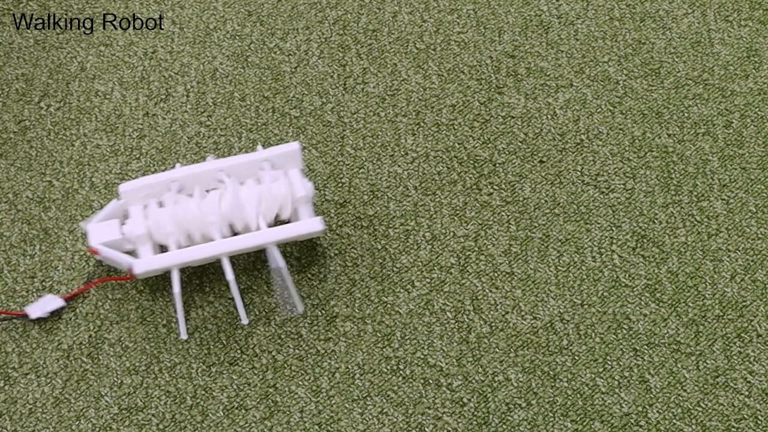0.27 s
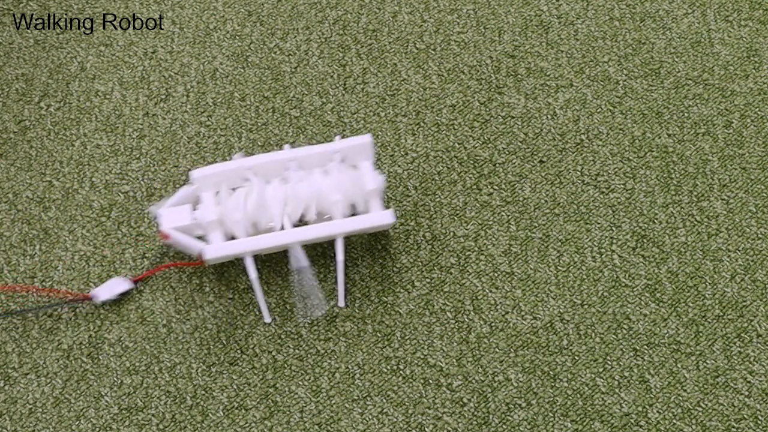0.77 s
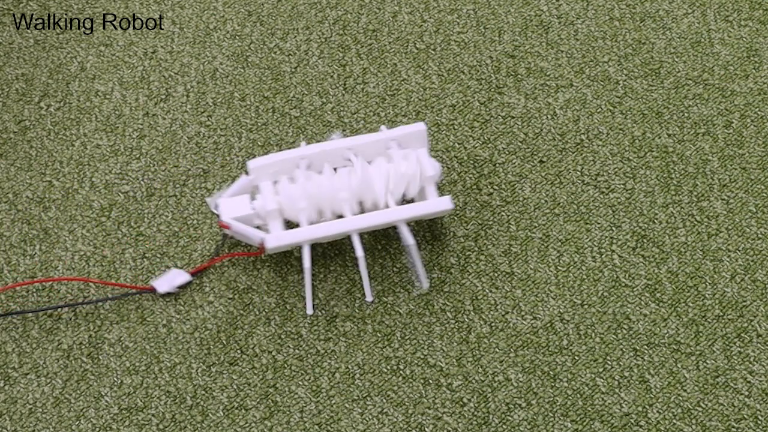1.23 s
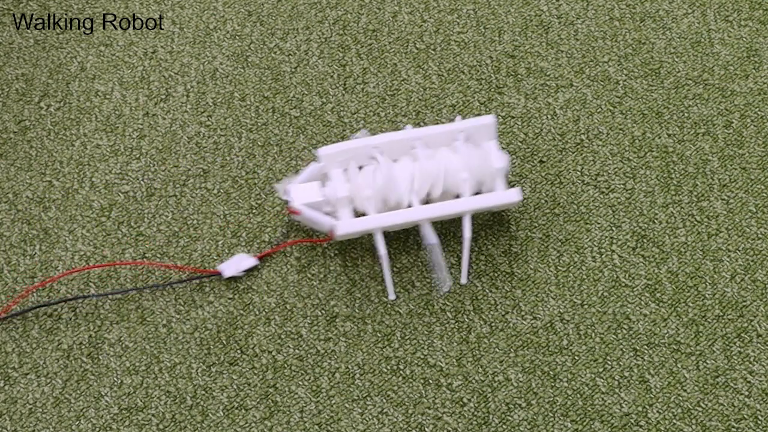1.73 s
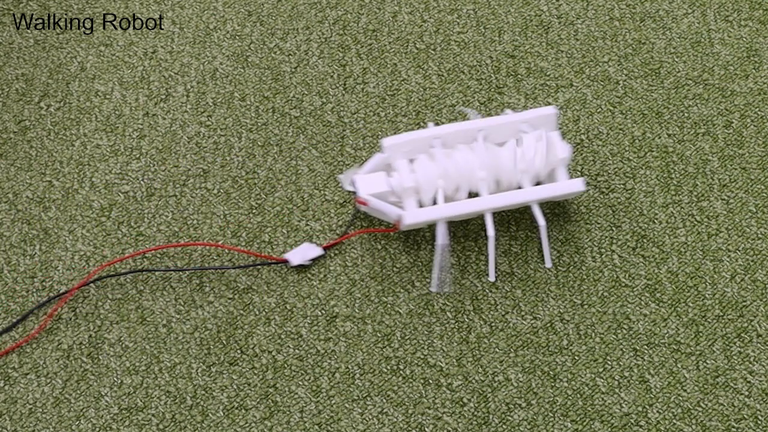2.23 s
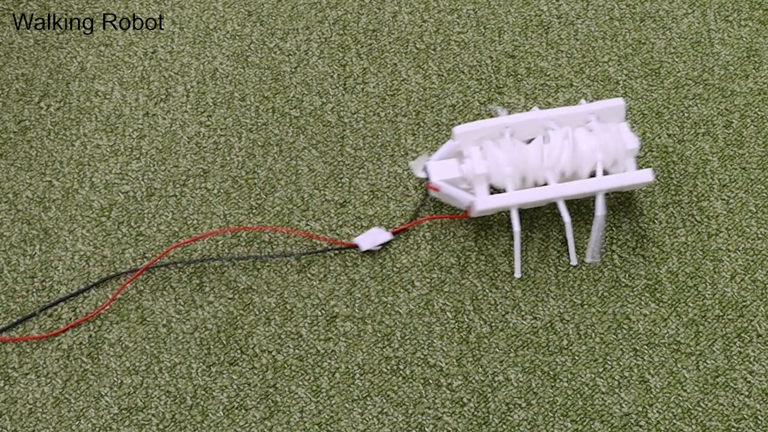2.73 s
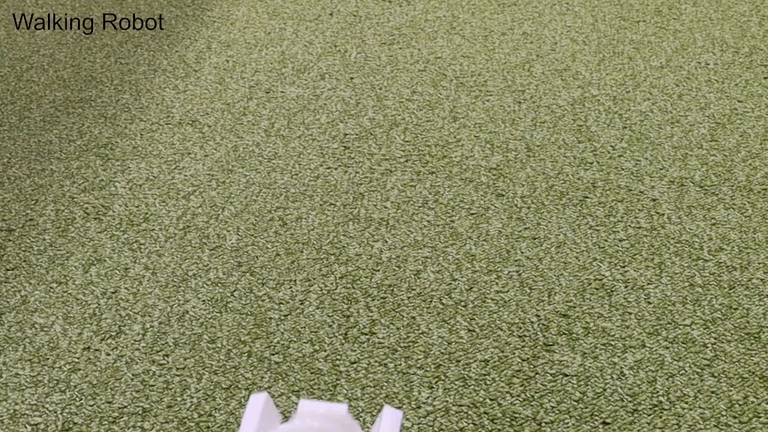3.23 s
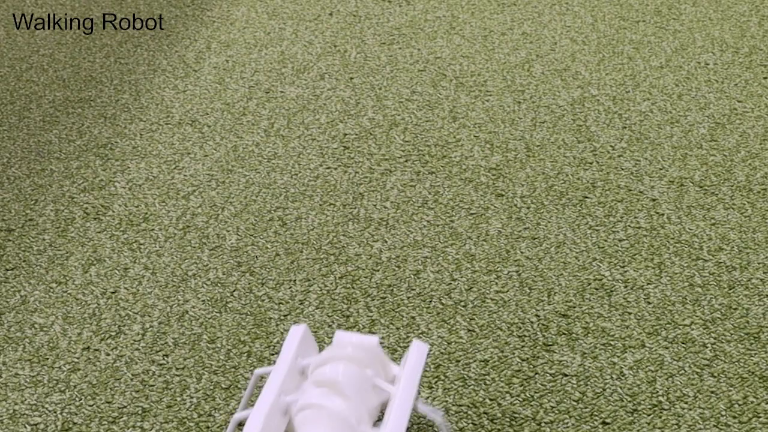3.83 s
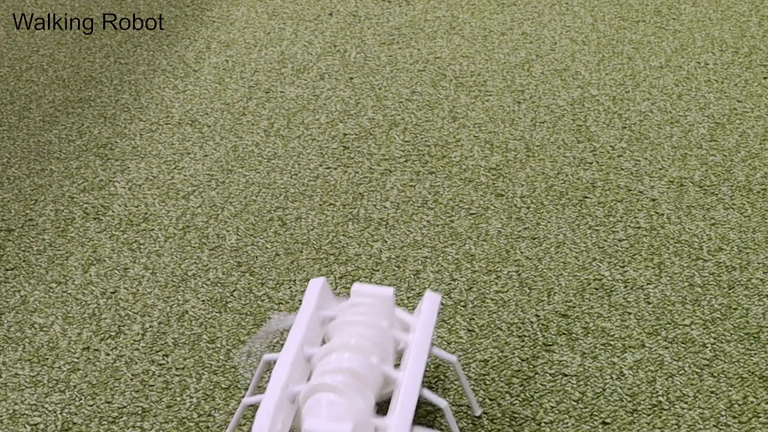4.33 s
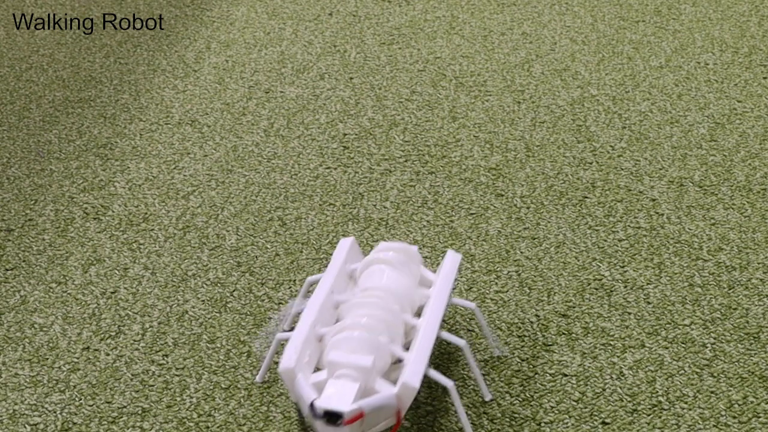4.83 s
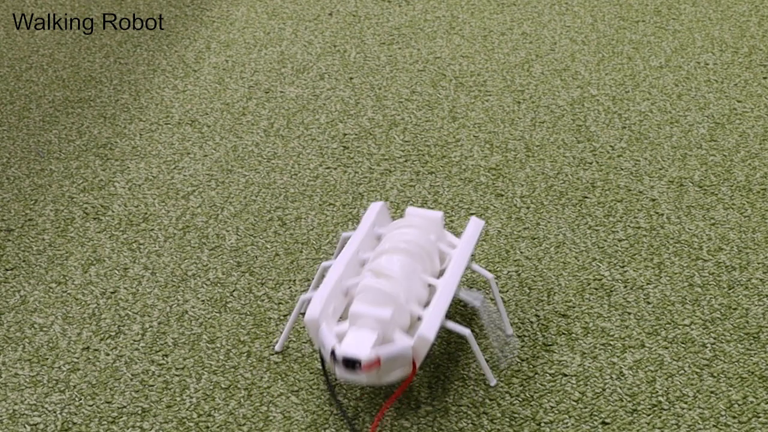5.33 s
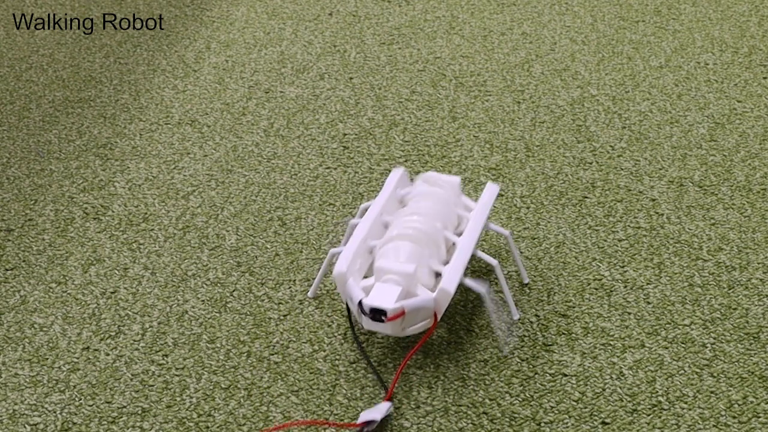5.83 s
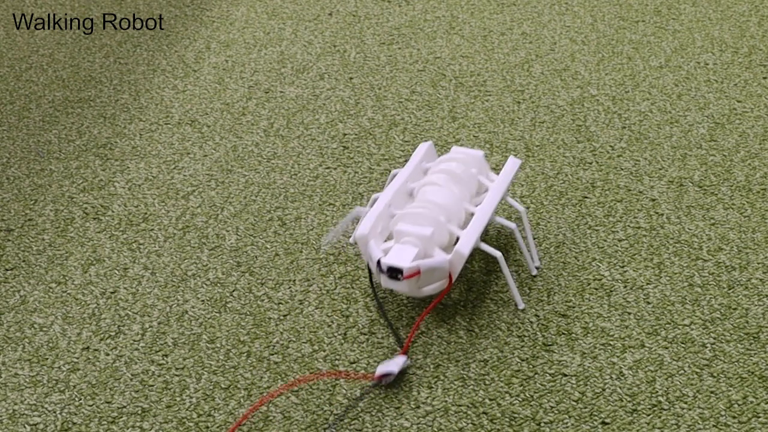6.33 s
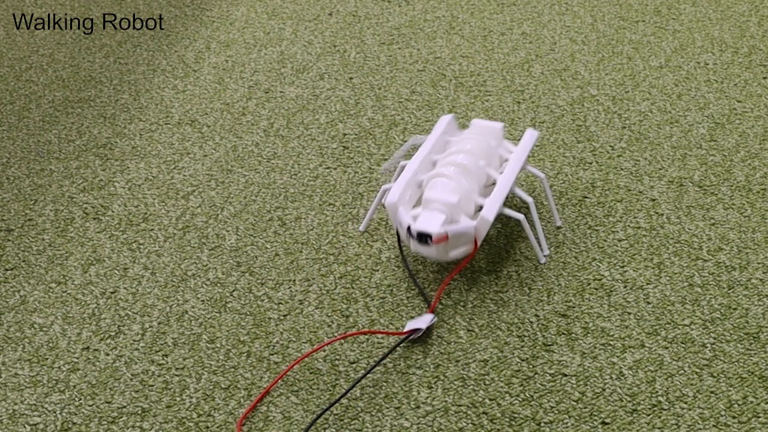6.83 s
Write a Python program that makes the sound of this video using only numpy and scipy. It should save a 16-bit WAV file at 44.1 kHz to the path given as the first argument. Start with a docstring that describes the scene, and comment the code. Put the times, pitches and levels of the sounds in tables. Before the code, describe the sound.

A small six-legged plastic robot walks across carpet in a quiet, damped room. Its geared motor whines at a high pitch, sagging, squealing and recovering about three times a second, while gear teeth rasp and loose links rattle lightly. It passes from the left to slightly right. After about three seconds the sound abruptly turns closer and hoarser, with a hollow growl and louder clicking, then eases a little as the robot walks away.

```python
"""A quiet, damped, carpeted room with a low hum. A small six-legged plastic robot walks through it,
heard first from the side, then closer from behind. One turn of its camshaft is one stride: lifting
the body drags the geared motor down, so that its whine sags, squeals and recovers. The gear teeth
rasp, each footfall shakes the loose links, and the hollow chassis drones on the carpet."""
import sys
import numpy as np
from scipy import signal
from scipy.fft import rfft, irfft, next_fast_len
from scipy.io import wavfile
from scipy.ndimage import uniform_filter1d, map_coordinates

SR = 44100
rng = np.random.default_rng(int(sys.argv[2]) if len(sys.argv) > 2 else 0)


def transcribe(u):
    """Save the signal u as a 16-bit wav file named by the first command-line argument.

    u: samples, shape (n,) or (channels, n), limited to [-1, 1]; the rate is SR.
    q: integer samples, one column per channel.
    """
    v = np.clip(np.atleast_2d(u).T, -1, 1)
    q = np.round(v * 32767).astype(np.int16)
    wavfile.write(sys.argv[1], SR, q)


N = 312669
T = np.arange(N) / SR
PINION, SHAFT = .288, .0302  # pinion tooth rate and motor turning rate as shares of the whine pitch
BODY_HZ, BODY_SCATTER = 1426, .074  # the frame's lowest ring, and its relative spread from tick to tick
# what the rubbing teeth radiate to the side: (frequency [Hz], level [dB])
SIDE_TEETH = [(600, -5), (2500, 1.5), (4200, -1), (5000, 4.5), (5900, 6.5), (6600, 8), (8400, 9.5),
              (10000, 4), (12600, 9.5), (13600, 4), (15500, -33)]


def undb(db):
    """Decibels to gain."""
    return 10 ** (np.asarray(db) / 20)


def unit(x):
    """Scale to rms 1."""
    return x / np.sqrt(np.mean(x ** 2))


def curves(table, at, period=None):
    """The columns of a table, joined by straight lines and read at the given places."""
    first, *columns = np.transpose(table)
    return [np.interp(at, first, c, period=period) for c in columns]


def drift(rate):
    """Smooth random motion of rms 1 that changes about rate times a second."""
    size = next_fast_len(N, True)
    rolloff = 1 + (np.fft.rfftfreq(size, 1 / SR) / rate) ** 4
    return unit(irfft(rfft(rng.standard_normal(size)) / rolloff, size)[:N])


def swell(angle, centre, width):
    """A smooth bump of height 1, once a turn; centre and width in turns."""
    return np.exp(-.5 * (((angle - centre + .5) % 1 - .5) / width) ** 2)


def colour(x, points, size=4096):
    """Minimum-phase EQ along (Hz, dB) points, rolled off below; white input keeps its level."""
    hz, db = np.transpose(points)
    f = np.fft.rfftfreq(size, 1 / SR) + 1
    gain = unit(undb(np.interp(np.log(f), np.log(hz), db)) * np.minimum(f / hz[0], 1) ** 2)
    cepstrum = irfft(np.log(gain))[:size // 2]
    cepstrum[1:] *= 2
    return signal.fftconvolve(x, irfft(np.exp(rfft(cepstrum, size))))[:N]


def low_cut(x, hz=700):
    """Thin out the bass, which small parts do not radiate."""
    return signal.sosfilt(signal.butter(2, hz, "high", fs=SR, output="sos"), x)


def tail(t60, size=16384):
    """A dying burst of noise with energy 1."""
    burst = rng.standard_normal(size) * np.exp(-np.log(1000) * T[:size] / t60)
    return burst / np.linalg.norm(burst)


def clicks(rate, spread_db=2.2):
    """Random contacts, rate a second, of varying force."""
    force = undb(spread_db * np.clip(rng.standard_normal(N), -2, 2))
    return unit((rng.random(N) < rate / SR) * force * rng.choice([-1, 1], N))


def pings(times, peak_db, hz, cycles, size=2048):
    """Small contacts, each ringing at its own pitch and dying by 60 dB within so many cycles."""
    out = np.zeros(N + size)
    for s, gain, f in zip(times, undb(peak_db), hz):
        turn = f * T[:min(size, int(cycles / f * SR))]
        decay = np.exp(-np.log(1000) * turn / cycles)
        start = int(s * SR)
        out[start:start + len(turn)] += gain * np.cos(2 * np.pi * turn) * decay
    return low_cut(out[:N])


def ticks(force_db, hz, scatter, cycles, count):
    """Separate ticks at random moments, uneven in strength and pitch."""
    at = rng.integers(0, N, count)
    strength, pitch = np.clip(rng.standard_normal((count, 2)), -1.7, 1.7).T
    return pings(at / SR, force_db[at] + 3 * strength, hz[at] * np.exp(scatter * pitch), cycles)


def room_tone(rumble_db, width_db):
    """A bed of low room noise with a slightly wavering hum, nearly alike on both sides."""
    # the room's rumble: (frequency [Hz], level [dB])
    rumble = [(36, -6), (48, -4), (60, -2), (135, -4.5), (210, -4), (340, 4), (480, -0.5), (1000, 3),
              (8000, -73)]
    # its steady hum: (frequency [Hz], level [dB])
    hum_tones = [(48.4, -74), (100, -66)]
    mid, side = (colour(rng.standard_normal(N), rumble) for _ in range(2))
    hum = sum(np.sqrt(2) * undb(db) * np.sin(2 * np.pi * hz * T + .38 * drift(4.3))
              for hz, db in hum_tones)
    return hum + undb(rumble_db) * (mid + undb(width_db) * side * np.array([[1], [-1]]))


def room(flanks, flank_db, echo_db, shade):
    """Each ear favours one flank of the robot; near reflections shift; damped walls answer dimly."""
    # the robot's stereo path: (time [s], left minus right [dB], left later than right [ms])
    path = [(0.2, 3.7, -.015), (0.75, 3.2, -.005), (2.95, -1.7, .035), (3.05, -0.1, 0), (4.3, 0, 0),
            (7.0, -1.4, .03)]
    mid = flanks.mean(axis=0)
    treble = low_cut(mid, 500)
    echoes = sum(shift(2.5 * T) * signal.fftconvolve(treble, tail(t60=.06))[:N]
                 for shift in (np.sin, np.cos))
    spread = undb(flank_db) * (flanks[0] - mid) + undb(echo_db) * echoes
    # the left side is a little brighter, the right a little fuller
    bright, full = (signal.sosfiltfilt(signal.butter(1, band, "band", fs=SR, output="sos"), mid)
                    for band in ([10500, 20000], [900, 3800]))
    spread += shade * (bright - full)
    pan_db, lag_ms = curves(path, T)
    ears = []
    for side in (1, -1):
        walls = undb(-13) * signal.fftconvolve(mid, np.roll(tail(t60=.2), SR // 200))[:N]
        delayed = (T - side * lag_ms / 2000) * SR
        direct = map_coordinates(mid + side * spread, [delayed], order=5, mode="mirror")
        ears.append((direct + walls) * undb(side * pan_db / 2))
    return np.array(ears)


def chassis_drone(level_db):
    """The hollow chassis drones on the carpet."""
    # its resonances: (frequency [Hz], level [dB])
    chassis = [(160, -19.5), (186, 1.5), (222, -10), (252, 0.5), (285, -8.5), (330, -4), (450, -24.5)]
    return colour(rng.standard_normal(N), chassis) * undb(level_db)


def link_taps(force_db, favoured_hz, count, t60=.021, fall_db_per_octave=11.5):
    """Each tap rings the links' modes in its own mix, most of all those near the favoured pitch."""
    # the links' modes: (frequency [Hz], level [dB])
    modes = [(2620, -1), (2960, -3), (3560, 2), (4110, 3)]
    at = rng.integers(0, N, count)
    tap_db = force_db[at] + 3.5 * np.clip(rng.standard_normal(count), -2, 1.5)
    t = T[:int(t60 * SR)]
    out = 0
    for hz, db in modes:
        octaves_off = np.abs(np.log2(hz / favoured_hz[at]))
        taps = np.zeros(N)
        taps[at] = undb(tap_db + db - fall_db_per_octave * octaves_off) * rng.uniform(-1, 1, count)
        ring = np.sin(2 * np.pi * hz * t) * np.exp(-np.log(1000) * t / t60)
        out = out + signal.fftconvolve(taps, ring)[:N]
    return low_cut(out)


def link_rattle(angle, frame, from_behind, gain_db, chatter_db, tap_db, body_db):
    """Loose links on both flanks chatter and tick at each footfall and set the frame ringing."""
    # feet landing: (angle [turns], width [turns], side boost [dB], rear boost [dB], favoured ring [Hz])
    footfalls = [(.0, 0.049, 8, 8.5, 2740), (.118, 0.025, 6, 6.5, 2330), (.29, 0.14, 4, 4, 2790),
                 (.38, 0.033, 2.5, 4.5, 3630), (.7, 0.083, 0, 3, 3000), (.89, 0.038, 2.5, 7, 2820)]
    shake_db = sum((rear_db if from_behind else side_db) * swell(angle, turn, width)
                   for turn, width, side_db, rear_db, _ in footfalls)
    ring_hz = curves(footfalls, angle, period=.97)[-1]
    force_db = shake_db + .98 * drift(6.4) + gain_db  # no two steps land alike
    flanks = []
    for _ in range(2):
        chatter = unit(clicks(2800, 2.4) * undb(1.5 * drift(130)))
        taps = link_taps(force_db + tap_db, ring_hz, count=620)
        body = ticks(force_db + body_db, np.full(N, BODY_HZ), BODY_SCATTER, cycles=90, count=380)
        flanks.append(colour(chatter * undb(chatter_db + force_db), frame) + taps + body)
    return np.array(flanks)


def link_knocks(rebound_db, body_db):
    """A link snaps over with a brief crack, rings, rebounds at a lower pitch and shakes the frame."""
    # links snapping over their play, and one knock as the scene changes at 3.015 s: (time [s], peak level [dB],
    # ring [Hz])
    snaps = [(0.3634, -22, 2850), (0.68, -20, 2950), (0.9937, -18, 3060), (1.115, -14.5, 6460),
             (3.0149, -16, 2750), (3.1284, -15, 3460), (3.1743, -13.5, 5600), (3.21, -14, 4080),
             (3.4398, -13.5, 3550), (3.543, -13, 3540), (3.8366, -14, 4050), (4.0677, -19, 2600),
             (4.6232, -12, 7140), (4.6922, -10, 3470), (4.775, -12.5, 4050), (4.8936, -14, 2810),
             (4.926, -16.5, 3580), (5.009, -11.5, 4090), (5.197, -18, 2580), (5.206, -20, 4120),
             (5.239, -17, 3530), (5.318, -15.5, 4220), (5.3327, -20, 2640), (5.7135, -16, 4090),
             (5.8205, -24, 2750), (5.953, -18, 4050), (6.1354, -23, 2700), (6.268, -18, 4090)]
    s, db, hz = np.transpose(snaps)
    ring = pings(s, db, hz, cycles=75)
    rebound = pings(s + rng.uniform(.0015, .004, len(s)), db + rebound_db, .76 * hz, cycles=45)
    body_hz = BODY_HZ * np.exp(BODY_SCATTER * rng.standard_normal(len(s)))
    body = pings(s + .003, db + body_db, body_hz, cycles=30)
    crack = signal.fftconvolve(pings(s, db, hz, cycles=4), tail(t60=.015))[:N]
    return ring + rebound + body + crack


def frame_growl(motor, level_db):
    """As the load builds, the frame jolts unevenly about once a motor turn: a hollow growl."""
    # what the juddering frame radiates: (frequency [Hz], level [dB])
    hollow = [(2050, -28), (2400, -7), (2600, 0), (2800, -3), (2980, -2), (3400, -25)]
    noise = rng.standard_normal(N)
    jolts = SHAFT * motor["cycles"] + .2 * drift(40)
    strength = rng.uniform(.3, 1, N)[np.floor(jolts).astype(int)]
    judder = unit(np.exp(-(jolts % 1) / .3) * strength)
    return colour(noise * judder, hollow) * swell(motor["angle"], .942, .075) * undb(level_db)


def cam_scrape(angle, level_db):
    """The cam slides off with a thin, high scrape."""
    scrape = colour(clicks(9000), [(10500, -25), (13300, 0), (14300, 2), (15500, -11)])
    return scrape * swell(angle, .12, .055) * undb(level_db)


def tooth_skid(angle, level_db):
    """At mid-stride the motor races and the unloaded teeth skid."""
    skid = colour(clicks(9000), [(7600, -33), (8350, -4), (8700, -3), (9300, -4), (10500, -35)])
    return skid * swell(angle, .503, .053) * undb(level_db)


def tooth_rasp(motor, spectrum, level_db, grit_db):
    """Teeth rub on each flank, harder when running free; single ones catch with bright, gritty ticks."""
    meshing = 1 + .5 * np.cos(motor["pinion_phase"])
    rubs = [unit(clicks(16000) * meshing * undb(.8 * drift(120))) for _ in range(2)]
    accents_db = 3.24 * swell(motor["angle"], .63, .084) + 3 * swell(motor["angle"], .15, .035)
    rub_db = level_db - 1.65 * motor["load"] + accents_db
    rasp = [colour(rub * undb(rub_db), spectrum) for rub in rubs]
    grit = [ticks(rub_db + grit_db, 2.6 * motor["nominal_hz"], scatter=.17, cycles=70, count=1600)
            for _ in range(2)]
    return np.array(rasp) + np.array(grit)


def geared_motor(angle, speed, race_hz, hoarseness):
    """Control signals of the motor: it sags as it lifts the body and chirps when it runs free."""
    # motor speed through a stride, dropping at each bite: (angle [turns], nominal whine pitch [Hz])
    stride_pitch = [(0, 3740), (.11, 3810), (.155, 3600), (.19, 4060), (.26, 4040), (.295, 4200),
                    (.35, 4070), (.45, 4260), (.52, 4280), (.57, 4100), (.63, 4140), (.77, 4110),
                    (.83, 4210), (.89, 4100), (.95, 4020)]
    # no two strides weigh the same: (time [s], nominal pitch shift under load [Hz], squeal boost [dB])
    strides = [(.03, -49.5, 1.5), (.35, -25.5, 2), (.66, -10.5, -1), (.98, 49.5, 3), (1.3, -5.5, 2.5),
               (1.61, 35, 1.5), (1.93, -8.5, 0.5), (2.24, 50, 0), (2.56, 41.5, 1), (2.88, -11, 4),
               (3.03, 5, -3.5), (3.35, -9, -1.5), (3.66, 71, -1), (3.97, -6.5, -1), (4.29, -45, -1),
               (4.6, -60.5, -0.5), (4.91, -58.5, 1), (5.22, -40.5, 0), (5.54, -9, 0), (5.85, -39.5, 1),
               (6.16, -26.5, 3), (6.48, 0.5, 3.5), (6.79, 40.5, 4)]
    # teeth bite as a cam takes up a leg: (angle [turns], width [turns], nominal boost [dB])
    bites = [(.23, .02, 7), (.322, .016, 7.5), (.55, .022, 6), (.69, .08, 6), (0.9, 0.05, 6.5)]
    free_hz, sag_hz = 4160, 305.5  # loaded below this pitch, and fully so this much lower
    nominal_hz = curves(stride_pitch, angle, period=1)[0]
    nominal_hz += race_hz * swell(angle, .86, .06)  # it races just before the load arrives
    shift_hz, effort_db = curves(strides, T)
    load = np.clip((free_hz - nominal_hz) / sag_hz, 0, 1)
    strain = swell(angle, .92, .05)  # the slack is taken up just before the heaviest load
    free = (1 - load) * (1 - strain)
    bite_db = sum(db * swell(angle, turn, width) for turn, width, db in bites)
    # running free, the gears wind up and slip ten times a stride: short falling chirps
    slip = (10 * angle + .27 + .13 * drift(12)) % 1
    chirps = 1 - free * (.55 - .9 * np.sin(np.pi * slip ** 1.5) ** 2)
    waver = 1 + .005 * drift(40) + .007 * free * drift(5) + .025 * free * (.5 - slip)
    pitch = speed * (nominal_hz + load * shift_hz) * waver
    cycles = np.cumsum(pitch) / SR
    shaft_phase = 2 * np.pi * SHAFT * cycles + .57 * drift(25)
    pinion_phase = 2 * np.pi * PINION * cycles + 1.1 * drift(200)
    # under load the off-centre pinion binds once in every motor turn
    throb = 1 + (.2 + .35 * load) * (np.cos(shaft_phase) - .4 * np.cos(2 * shaft_phase))
    # slack teeth bounce, so the partials are cleanest while the load presses them together
    blur = .3 + hoarseness * free * undb(-bite_db)
    # once the body is lifted, the teeth let go at once and take hold again gradually
    since_release = (angle - .153) % 1
    release_db = -17 * uniform_filter1d(np.exp(-since_release / .06), size=150)
    return dict(angle=angle, nominal_hz=nominal_hz, pitch=pitch, cycles=cycles, load=load,
                strain=strain, effort_db=effort_db, bite_db=bite_db, release_db=release_db,
                chirps=chirps, throb=throb, blur=blur, pinion_phase=pinion_phase)


def partial(cycles, level_db, envelope, blur, flutter=2.5):
    """One line of gear tone; uneven teeth blur its phase (radians) and flutter its level."""
    flutter_db = 1.5 * flutter * np.tanh(drift(60))
    tone = np.sin(2 * np.pi * cycles + blur * drift(500))
    return unit(tone * envelope * undb(flutter_db)) * undb(level_db)


def gear_whine(motor, first_db, second_db, sideband_db, bite_depths):
    """Meshing teeth sing two partials that swell with each bite; the pinion adds a line above each."""
    cycles, load, chirps, bite_db = motor["cycles"], motor["load"], motor["chirps"], motor["bite_db"]
    first_grip_db, second_grip_db = (depth * bite_db + motor["release_db"] / 2 for depth in bite_depths)
    # the lowest partial shakes with the loose frame, comes and goes, and fades under load
    shake = .06 * drift(70)
    flicker = chirps ** .7 * undb(1.8 * drift(14))
    tone = partial(cycles + shake, first_db + first_grip_db - load, flicker, blur=.4, flutter=2.2)
    pulse = chirps * np.sqrt(motor["throb"])
    tone += partial(2 * cycles, second_db + second_grip_db + 3 * load, pulse, motor["blur"])
    # the hoarse pinion lines: the lower comes late in the stride, the upper with the bites
    late = chirps * swell(motor["angle"], .73, .14)
    tone += partial((1 + PINION) * cycles + 3 * shake, sideband_db, late, blur=.9, flutter=2.2)
    upper_db = sideband_db + 1.96 * bite_db - 8.5
    return tone + partial((2 + PINION) * cycles, upper_db, chirps * (1 - load), blur=.42)


def gear_squeal(motor, level_db, bite_depth, load_db, strain_db, undertone_db):
    """The third partial and its pinion sidebands squeal under load, gliding through resonances."""
    # how the gearbox passes the squeal: (frequency [Hz], gain [dB])
    gearbox = [(10300, -3.5), (11400, 1), (11900, -2), (12300, 0), (12750, -5), (13300, -5), (13900, -18)]
    load, throb = motor["load"], motor["throb"]
    contact_db = level_db + bite_depth * motor["bite_db"] + motor["release_db"]
    contact_db += (load_db + motor["effort_db"]) * load
    strained_db = contact_db + strain_db * motor["strain"]
    squeal = 0
    for order, db in ((3 - PINION, undertone_db), (3, 0), (3 + PINION, -8)):
        line_db = strained_db + db + curves(gearbox, order * motor["pitch"])[0]
        squeal += partial(order * motor["cycles"], line_db, motor["chirps"] * throb, motor["blur"] + .1)
    # the squealing contact also scrapes, which rings a broad resonance of the gearbox
    resonance = [(6000, -57), (9800, -19), (11600, 7.5), (12400, 12), (13300, 6), (15500, -11)]
    fizz = np.array([colour(clicks(11000), resonance) for _ in range(2)])
    return squeal + fizz * np.sqrt(throb) * undb(contact_db + 3.5 - 3 * load)


def camshaft(heavy_load_s, stride_s):
    """The angle of the evenly turning shaft in turns, 0 at the heavy load."""
    return (T - heavy_load_s) / stride_s % 1


def passing(nearest_s, fall_db_per_s):
    """Level in dB that peaks as the gearbox faces the listener and falls off before and after."""
    return -fall_db_per_s * (np.hypot(T - nearest_s, .3) - .3)


def robot_from_side():
    """The robot crosses from left to right: a clear whine and a light rattle."""
    # what the rattling frame radiates to the side: (frequency [Hz], level [dB])
    frame = [(150, -27.5), (480, -14.5), (800, -6.5), (1100, -1), (1500, 3.5), (1850, -3), (2300, -1.5),
             (2900, 2), (3600, 3), (4700, -5), (7000, -26), (15000, -6)]
    angle = camshaft(heavy_load_s=.0125, stride_s=.31595)
    facing_db = passing(nearest_s=2.2, fall_db_per_s=4.5)
    motor = geared_motor(angle, speed=1, race_hz=10.02, hoarseness=.08)
    return (gear_whine(motor, first_db=-38.5 - .36 * facing_db, second_db=-32.5 + .88 * facing_db,
                       sideband_db=-43 + facing_db / 2, bite_depths=(.6, 1.2))
            + gear_squeal(motor, -33 + facing_db, bite_depth=.6, load_db=10, strain_db=7.5,
                          undertone_db=-11.5)
            + cam_scrape(angle, -26.5)
            + tooth_rasp(motor, SIDE_TEETH, -24 + .24 * facing_db, grit_db=-1)
            + tooth_skid(angle, -29 + .47 * facing_db)
            + frame_growl(motor, -56 + 1.1 * facing_db)
            + link_rattle(angle, frame, from_behind=False, gain_db=.05 * facing_db,
                          chatter_db=-31.5, tap_db=-27.5, body_db=-39)
            + chassis_drone(-50.5))


def robot_from_behind():
    """The robot walks away, a little faster: a hoarser whine, a growling frame and a louder rattle."""
    # what the rattling frame radiates to the rear: (frequency [Hz], level [dB])
    frame = [(150, -32), (480, -18), (1050, -9), (1300, 2.5), (1380, -3), (1465, 6.5), (1600, -2),
             (1900, -4.5), (2300, -2), (2800, 1), (3600, -6.5), (6000, -9.5), (7000, -7), (15000, -19.5)]
    # what the rubbing teeth radiate to the rear: (frequency [Hz], level [dB])
    teeth = [(600, -7.5), (2500, -1), (4200, 6.5), (5400, -6), (6000, -12), (6700, 1), (8600, 5),
             (10900, 8), (12600, 7), (13600, 4), (15500, -4.5)]
    angle = camshaft(heavy_load_s=3.0145, stride_s=.31285)
    facing_db = passing(nearest_s=3.84, fall_db_per_s=3.5)
    motor = geared_motor(angle, speed=1.012, race_hz=115, hoarseness=.3)
    return (gear_whine(motor, first_db=-35, second_db=-36.5 + .07 * facing_db,
                       sideband_db=-34.5 + facing_db / 2, bite_depths=(.9, .7))
            + gear_squeal(motor, -32.5 + facing_db, bite_depth=1.3, load_db=13, strain_db=-1.5,
                          undertone_db=-7)
            + cam_scrape(angle, -28.5)
            + tooth_rasp(motor, teeth, -22 + .42 * facing_db, grit_db=3.5)
            + tooth_skid(angle, -26 + .47 * facing_db)
            + frame_growl(motor, -23 + 1.1 * facing_db)
            # as it veers away, the rasp of its flank comes back into earshot
            + colour(clicks(16000, 2), SIDE_TEETH) * undb(-43.5 - 1.54 * facing_db)
            + link_rattle(angle, frame, from_behind=True, gain_db=.3 * facing_db,
                          chatter_db=-29, tap_db=-22.5, body_db=-34)
            + chassis_drone(-55.5))


def scene():
    """The robot from the side, then abruptly from behind, over the room tone."""
    switch_s = 3.012
    robot = np.where(T < switch_s, robot_from_side(), robot_from_behind())
    robot += link_knocks(rebound_db=-4, body_db=-9.5)
    placed = room(robot, flank_db=-6, echo_db=-11.5, shade=.15)
    return placed + room_tone(rumble_db=-51.5, width_db=-13.5)


def record(dry):
    """A steep low-pass takes off the top above 15.7 kHz."""
    return signal.sosfilt(signal.ellip(10, .2, 80, 15700, fs=SR, output="sos"), dry)


dry = scene()
out = record(dry)
transcribe(out)
```